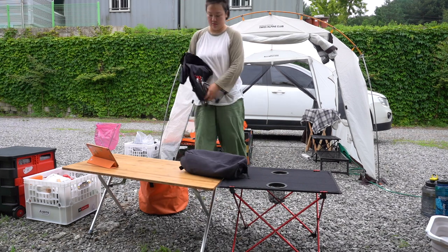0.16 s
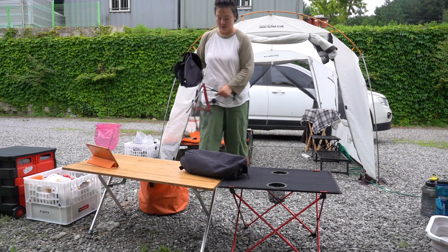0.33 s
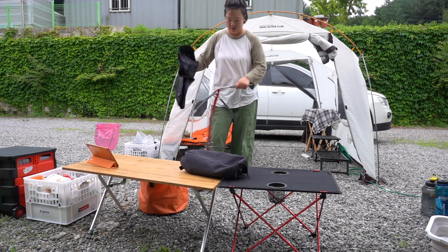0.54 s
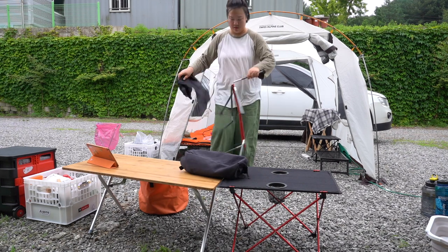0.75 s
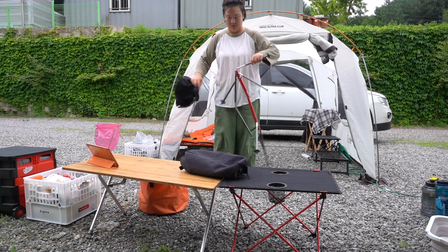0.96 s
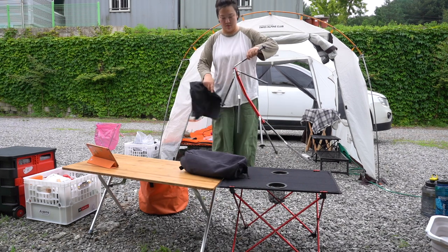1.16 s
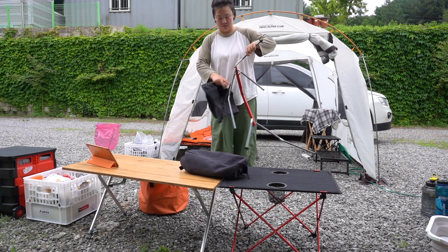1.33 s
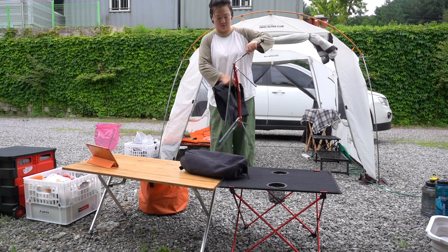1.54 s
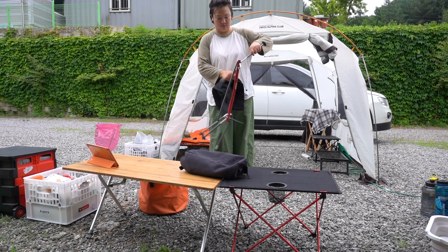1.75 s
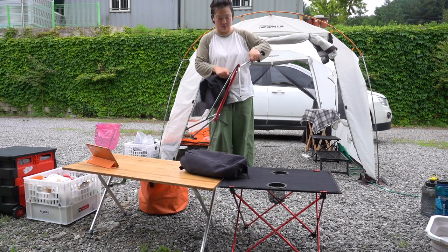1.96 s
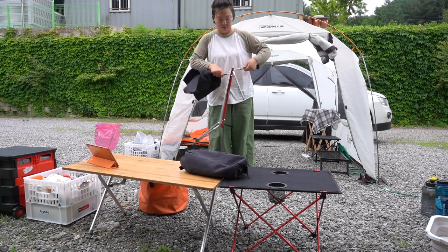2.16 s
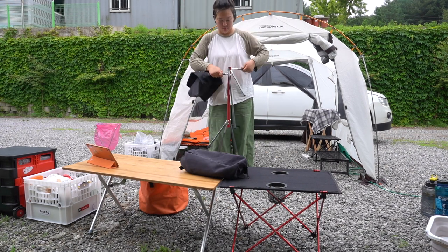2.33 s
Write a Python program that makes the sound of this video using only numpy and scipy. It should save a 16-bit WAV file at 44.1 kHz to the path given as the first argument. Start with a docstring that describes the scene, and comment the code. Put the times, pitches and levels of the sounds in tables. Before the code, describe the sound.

The tubes of a folding metal stand rattle and snap into their sockets, densely at first, then in scattered clicks over light cloth rubbing. A short scrape and faint squeak follow, heard from a few steps away outdoors.

```python
"""A folding metal stand is pulled from its cloth bag and shaken open on a gravel yard, a few steps away.
Its tubes knock together and snap into their sockets: each knock is a crack, a short dense rattle
and a thin ring. Cloth and tubes rub and bump between the knocks; then a tube scrapes home and a joint
squeaks faintly. The yard adds a short tail, over a quiet outdoor wash."""
import sys
import numpy as np
from scipy import signal
from scipy.io import wavfile
from scipy.ndimage import uniform_filter1d

SR = 44100
rng = np.random.default_rng(int(sys.argv[2]) if len(sys.argv) > 2 else 0)


def inscribe(sig):
    """Save sig as 16-bit PCM at rate SR to the path in sys.argv[1].

    A 1-D sig is mono; a 2-D sig holds one channel per row.
    Samples are clipped to [-1, 1] before scaling.
    """
    pcm = np.round(np.clip(np.atleast_2d(sig).T, -1, 1) * 32767)
    wavfile.write(sys.argv[1], SR, pcm.astype(np.int16))


N = 105840

ATTACK_S = 0.00037  # onset of crack, rattle and ring
METAL_LIKENESS = 0.42  # left-right likeness of rattle, ring and squeak


def amp(db):
    """Decibels to gain."""
    return 10 ** (np.asarray(db) / 20)


def unit(x):
    """Scales to a mean energy of 1 per channel."""
    return x / np.sqrt(np.mean(np.sum(x ** 2, -1)) + 1e-20)


def read(points, hz):
    """Reads a curve on a log-frequency axis."""
    f, value = np.transpose(points)
    return np.interp(np.log(hz + 1), np.log(f), value)


def add(mix, start_s, sound):
    """Lays a sound into the mix."""
    part = mix[:, max(round(start_s * SR), 0):][:, :sound.shape[-1]]
    part += sound[..., :part.shape[1]]


def stereo_noise(likeness, size):
    """White noise, from wide (likeness 0) to mono (1)."""
    left, other = rng.standard_normal((2, size))
    return np.array([left, likeness * left + np.sqrt(1 - likeness ** 2) * other])


def colour(x, curve_db, size=2048):
    """Minimum-phase EQ from a function that gives dB at each frequency."""
    log_gain = np.log(amp(curve_db(abs(np.fft.fftfreq(size, 1 / SR)))))
    taps = np.fft.ifft(np.exp(np.conj(signal.hilbert(log_gain)))).real
    return signal.fftconvolve(x, taps[None, :size // 2], axes=1)[:, :x.shape[1]]


def flatten(x, size=2048):
    """Evens out a burst's spectrum, so that it has no pitch of its own."""
    power = np.mean(abs(np.fft.fft(x, size)) ** 2, 0)
    return unit(colour(x, lambda f: -10 * np.log10(power + power.mean() / 20), size))


def band_decay(x, t60_curve, size=128):
    """Lets each band of a noise die at its own speed."""
    hz, t, spectrum = signal.stft(x, SR, nperseg=size)
    fade = np.exp(-np.log(1000) * t / read(t60_curve, hz)[:, None])
    return unit(signal.istft(spectrum * fade, SR, nperseg=size)[1][:, :x.shape[1]])


def resonate(x, hz, width_hz):
    """Narrows noise to one resonance, at an RMS of 1."""
    carrier = np.exp(2j * np.pi * np.cumsum(np.full(N, hz)) / SR)
    pole = np.exp(-np.pi * width_hz / SR)
    band = carrier * signal.lfilter([1], np.poly([pole, pole]), x / carrier)
    return np.sqrt(N) * unit(band.real)


def air(level_db=-50.5, drift_db=1.8, size=1024):
    """Distant outdoor wash with faint drifting patches, wider toward the treble."""
    # tone of the wash: frequency_hz, level_db
    tone = [(25, -44), (108, -21.5), (190, -14.5), (344, -11.5), (516, -6), (714, 0.5), (1260, -0.5),
            (1890, -7.5), (3160, -20), (7310, -20), (16000, -24.5)]
    # stereo image: frequency_hz, left_right_likeness
    image = [(150, 0.9), (500, 0.75), (1200, 0.22), (3000, 0.073)]
    hz = np.fft.rfftfreq(size, 1 / SR)
    a, b, c, d, patches = rng.standard_normal((4 * N // size + 5, len(hz), 5)).T
    patches = uniform_filter1d(patches, size=8, axis=0)  # smooth across frequency
    patches = uniform_filter1d(patches, size=14, axis=1)  # and across time
    likeness = read(image, hz)[:, None]
    left = a + 1j * b
    right = likeness * left + np.sqrt(1 - likeness ** 2) * (c + 1j * d)
    gain = amp(read(tone, hz)[:, None] + drift_db * patches / patches.std())
    wash = signal.istft(gain * np.array([left, right]), nperseg=size, noverlap=size * 3 // 4)[1]
    return amp(level_db) * np.sqrt(N) * unit(wash[:, :N])


def yard(x, wet_db=-15, build_s=0.0076, size=26000):
    """Faint scatter from gravel, tent and hedge."""
    # decay of the yard: frequency_hz, t60_s
    decay = [(300, 0.1), (2000, 0.21), (6000, 0.36), (10000, 0.37)]
    tail = band_decay(rng.standard_normal((2, size)), decay)
    build = 1 - np.exp(-(np.arange(size) / SR / build_s) ** 2)
    return amp(wet_db) * signal.fftconvolve(x, unit(tail * build), axes=1)[:, :N]


def rubbing(slips_per_s=2200):
    """Tiny slips of cloth and tube with an equal share of hiss, following the effort of the hands."""
    # effort of the hands: time_s, level_db
    effort = [(0, -44.5), (.04, -44), (.06, -54.5), (.11, -50), (.16, -44), (.23, -35), (.29, -48.5),
              (.39, -37), (.44, -46.5), (.69, -38), (0.76, -48.5), (.79, -41), (.88, -47.5), (1.06, -49),
              (1.16, -55), (1.47, -51.5), (1.53, -61), (1.58, -38.5), (1.64, -45), (1.73, -41.5),
              (1.755, -51), (1.779, -41.5), (1.83, -56), (1.92, -50.5), (2.02, -57), (2.13, -61.5),
              (2.18, -54.5), (2.23, -59.5), (2.4, -57.5)]
    # tone of the friction: frequency_hz, gain_db
    tone = [(100, -50), (300, -28.5), (1000, -5.5), (2000, 4.5), (3500, 0.5), (6000, -1.5), (10000, -5),
            (15000, -15.5)]
    slips = rng.random(N) < slips_per_s / SR
    slip_db = np.minimum(rng.exponential(1, N), 4)
    grains = unit(slips * amp(slip_db) * stereo_noise(0.83, N))
    hiss = unit(stereo_noise(0.14, N))
    level = amp(np.interp(np.arange(N) / SR, *np.transpose(effort)))
    return level * np.sqrt(N) * unit(colour(grains + hiss, lambda f: read(tone, f)))


def joint_squeak(peak_s=2.36, fade_s=0.044, level_db=-55.5):
    """A joint turns with a faint, rough squeak."""
    squeak = resonate(stereo_noise(METAL_LIKENESS, N), hz=3560, width_hz=300)
    swell = np.exp(-abs(np.arange(N) / SR - peak_s) / fade_s)
    return amp(level_db) * squeak * swell


def tube_scrape(peak_s=1.778, fade_s=0.01, level_db=-37):
    """One tube slides home in another; the friction rings it briefly."""
    # modes of the sliding tube: pitch_hz, level_db
    modes = [(2100, 1.5), (2550, 3), (3580, 3), (4900, -1), (9750, -8)]
    scrape = sum(amp(db) * resonate(stereo_noise(0.74, N), hz, width_hz=150) for hz, db in modes)
    swell = np.exp(-abs(np.arange(N) / SR - peak_s) / fade_s)
    return amp(level_db) * np.sqrt(N) * unit(scrape) * swell


def bump(hz, level_db, rise_s=0.0021, size=2048):
    """A muffled, hollow push of a few cycles."""
    t = np.arange(size) / SR
    envelope = t / rise_s * np.exp(1 - t / rise_s)
    return amp(level_db) * envelope * np.sin(2 * np.pi * hz * t)


def tube_ring(hz, t, t60_s, flutter_width_hz=56):
    """One dying mode that flutters as the loose tube chatters."""
    pole = np.exp(-np.pi * flutter_width_hz / SR)
    noise = stereo_noise(METAL_LIKENESS, 2 * len(t)) + 1j * stereo_noise(METAL_LIKENESS, 2 * len(t))
    flutter = signal.lfilter([1], np.poly([pole, pole]), noise)[:, len(t):]
    wave = (1 + flutter / flutter.std()) * np.exp(2j * np.pi * (hz * t + rng.random()))
    envelope = (1 - np.exp(-t / ATTACK_S)) * np.exp(-np.log(1000) * t / t60_s)
    return unit(wave.real * envelope)


def crack(t, decay_s=0.0017, snap_db=-11):
    """The hit itself: a sharp first contact and a tiny burst of noise."""
    envelope = (1 - np.exp(-t / ATTACK_S)) * np.exp(-t / decay_s)
    burst = unit(np.tanh(stereo_noise(0.81, len(t))) * envelope)
    return flatten(burst + amp(snap_db) * (t == 0))


def rattle(t):
    """The dense rattle of a joint, its treble lasting longest."""
    # decay of the rattle: frequency_hz, t60_s
    decay = [(500, 0.04), (2000, 0.071), (5000, 0.087), (9000, 0.13), (15000, 0.11)]
    attack = 1 - np.exp(-t / ATTACK_S)
    return unit(attack * band_decay(stereo_noise(METAL_LIKENESS, len(t)), decay))


def knock(low_db, mid_db, high_db, bright_db, top_db, lower_hz, upper_hz, ring_hz, ring_db, rattle_db):
    """Metal meets metal: a sharp crack, the rattle of the joint, then the tubes ring."""
    # tube modes of the whole frame: pitch_hz, level_db, t60_s
    modes = [(1641, -24.5, 0.037), (2092, -30, 0.041), (2272, -26.5, 0.036), (3360, -26.5, 0.078),
             (3990, -31, 0.044), (8100, -30.5, 0.22), (9900, -22.5, 0.23)]
    t = np.arange(10240) / SR
    impact = unit(crack(t) + amp(rattle_db) * rattle(t))
    frame = sum(amp(db) * rng.uniform(0.15, 1.3) * tube_ring(hz, t, t60_s) for hz, db, t60_s in modes)
    tone = [(70, low_db - 24), (304, low_db - 13.5), (900, low_db), (2200, mid_db),
            (4800, high_db), (8600, bright_db), (13000, top_db), (14600, top_db - 9)]

    def body_db(f, boost_db=9.5, half_width_hz=121):
        """The struck parts resonate at two hollow pitches and at the ringing pitch."""
        return sum(boost_db / (1 + ((f - hz) / half_width_hz) ** 2)
                   for hz in (lower_hz, upper_hz, ring_hz))

    blow = colour(impact + frame, lambda f: read(tone, f) + body_db(f))
    return blow + amp(ring_db) * tube_ring(ring_hz, t, t60_s=0.095)


def widen(x):
    """Narrows the lows and spreads the bright rattle widest."""
    # stereo width: frequency_hz, side_gain_db
    width = [(1200, -9.5), (2500, -1.5), (5000, 1), (12000, 3)]
    mid, side = (x[:1] + x[1:]) / 2, (x[:1] - x[1:]) / 2
    side = colour(side, lambda f: read(width, f))
    return np.vstack([mid + side, mid - side])


def swing(x):
    """The stand swings out to the right and partway back as it opens."""
    # path of the stand: time_s, left_minus_right_db
    path = [(.1, -2), (1.02, -5.5), (1.3, -5), (1.6, -4), (2.1, -4)]
    pan_db = np.interp(np.arange(N) / SR, *np.transpose(path))
    gains = amp([pan_db / 2, -pan_db / 2])
    return x * gains / np.sqrt(np.mean(gains ** 2, 0))


def scene(low_cut_hz=134):
    """The stand opens in the yard, over the outdoor wash."""
    # bumps as the bag comes off and the frame swings open: start_s, pitch_hz, level_db
    bumps = [(.22, 1680, -32), (0.3243, 2020, -36), (.504, 645, -40), (.563, 378, -43), (.88, 343, -51),
             (1.028, 960, -36), (1.588, 2010, -40)]
    # tubes knocking and snapping home: start_s, low_db, mid_db, high_db, bright_db, top_db (EQ bands),
    # lower_hz, upper_hz (hollow resonances), ring_hz, ring_db, rattle_db (against the crack)
    knocks = [ (0.1225, -8, -2.5, -3.5, -8.5, -23, 1740, 4160, 3740, -32, -2),
              (.139, -9, -1.5, -7.5, -15, -16, 1860, 4120, 2130, -26, 2),
              (0.194, -6, -5, -2, -19, -18, 1300, 2840, 5400, -20, -4.5),
              (0.2359, -7.5, -6, -3, -11, -27, 2070, 2900, 7060, -16, -8),
              (.245, -4, -20, 2.5, -6, -25, 2040, 4250, 7900, -16, -5),
              (0.2567, -17, -5, 1.5, -4.5, -19, 5630, 7700, 2790, -17, -2),
              (0.333, -9, 6.5, 3.5, 0.5, -12, 2230, 4820, 7470, -20, -3.5),
              (0.35, -14, -11, 2, -4, -13, 2680, 4640, 5800, -26, -4),
              (.376, 1, 4.5, 5, 0, -6.5, 2370, 3820, 9850, -12, 2),
              (0.4027, -6.5, 8, 9.5, 2, -7, 1745, 3400, 1554, -17, 0.5),
              (.463, -8, 1, 7, -9, -23, 2430, 6440, 2041, -10, -8),
              (0.4665, -2, 12, 13, 13, 5.5, 4120, 12300, 2060, -0.5, 5.5),
              (0.4781, -5, 6.5, 14, 12.5, 0, 1750, 3970, 4270, -5, 5.5),
              (0.5172, -4, -1, 1, -3, -13, 2300, 3700, 1830, -15, -2.5),
              (0.5247, -9, -1, 5.5, 2.5, -4.5, 1770, 5530, 5190, -20, 4),
              (0.5622, -1.5, 5.5, 10.5, 8.5, 5, 2700, 3240, 5520, 1, 8),
              (0.5782, -11, 9, 6, 14, 7, 4030, 8470, 5520, 5, 4),
              (.586, -20, 7, 9, 8, 2, 2920, 8600, 5650, 4, 13),
              (.599, 1, 11, 6.5, -2, 1, 1980, 2500, 8800, 1.5, 7),
              (.61, -0.5, 4, 7, 6.5, 0, 1160, 9700, 5540, -13, 12),
              (0.633, -4.5, 5, -2, -10, -2, 1990, 3590, 5380, -24, 12),
              (.659, 3, 8.5, 14.5, 9.5, 8, 2550, 6500, 9515, 4, 9),
              (0.6629, -8, 5, 8.5, 7, 6, 1440, 3660, 6070, -9, 2),
              (0.8029, -1, 10.5, 10, 7.5, 8.5, 860, 10220, 2703, -19, 1.5),
              (0.9195, -7, 5, 6, 1.5, -6, 6400, 8530, 2360, -22, 2.5),
              (.9447, -16, 3.5, 15, 2.5, -2, 2430, 4080, 4370, -23, -8),
              (0.95, -24, -21, 8.5, 6.5, 1.5, 6170, 12500, 5720, -6, 12),
              (1.0026, -35, -14, -3, 2.5, -5, 4530, 8500, 7470, -12, -1),
              (1.028, -5.5, 1, 6, 1, -6, 2670, 3560, 4880, -12, 9),
              (1.2113, -7, 0, 2.5, -8, -8, 2260, 6260, 5280, -19, 0),
              (1.214, -5.5, 3, 5, -3, 1.5, 3830, 9740, 5320, -23, 1),
              (1.3177, -13, 2, 6.5, 8.5, -9, 3770, 8560, 7300, -13, -6),
              (1.319, -2.5, -1, 7.5, 6.5, 3.5, 2040, 6620, 7360, -27, -6),
              (1.5053, -13, -5, 1, 4.5, -8.5, 4080, 5210, 7680, -19, -8),
              (1.556, -6, -1.5, -1.5, -3.5, -12, 1920, 2870, 4260, -28, 7),
              (1.572, -1.5, -5.5, -4, -6, -11, 2030, 6760, 5400, -16, 4.5),
              (1.6023, -12, 3.5, 9, 10.5, 13.5, 2160, 8600, 5620, -13, 0.5)]
    stand = rubbing() + tube_scrape() + joint_squeak()
    for start_s, *voicing in knocks:
        add(stand, start_s, knock(*voicing))
    for start_s, pitch_hz, level_db in bumps:
        add(stand, start_s, bump(pitch_hz, level_db))
    low_cut = signal.butter(2, low_cut_hz, "high", fs=SR, output="sos")  # a light stand has no bass
    stand = swing(signal.sosfilt(low_cut, widen(stand)))
    return stand + yard(stand) + air()


def record(dry, high_cut_hz=15900):
    """A steep low-pass trims the highest treble."""
    taps = signal.firwin(255, high_cut_hz, window=("kaiser", 8), fs=SR)
    return signal.oaconvolve(dry, taps[None], "same")


dry = scene()
out = record(dry)
inscribe(out)
```